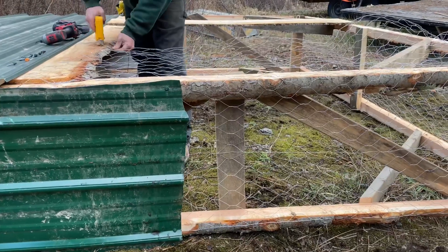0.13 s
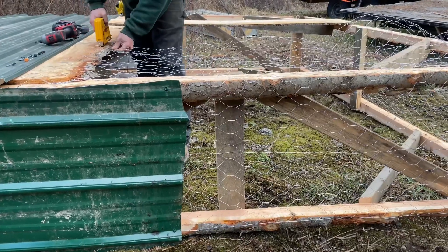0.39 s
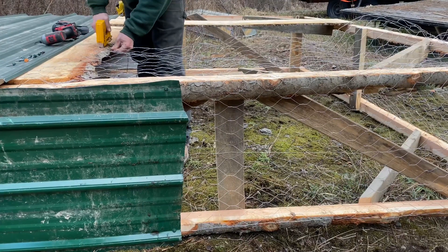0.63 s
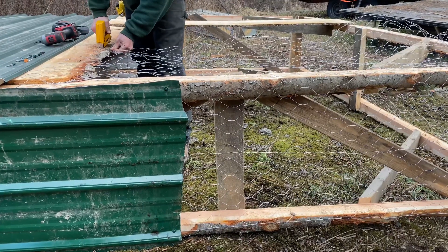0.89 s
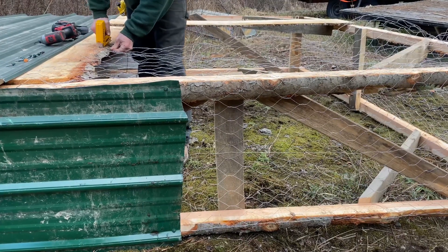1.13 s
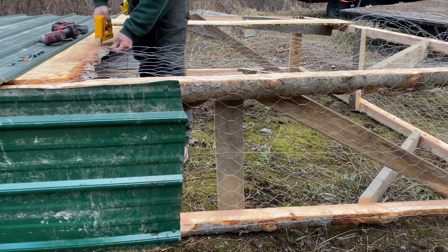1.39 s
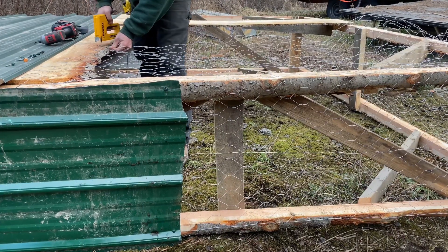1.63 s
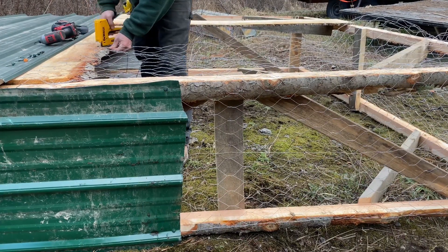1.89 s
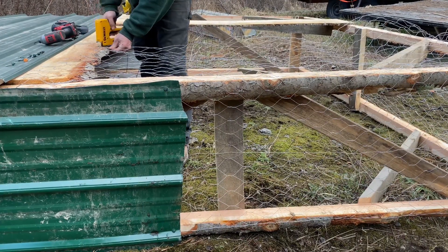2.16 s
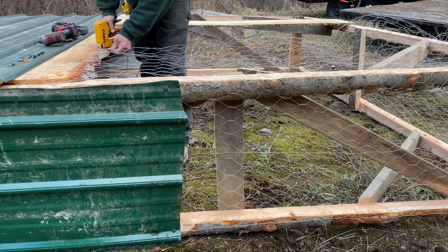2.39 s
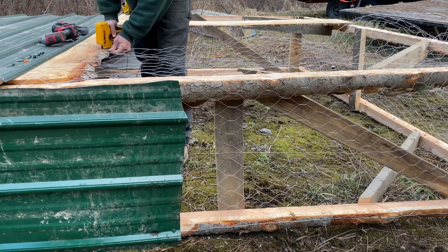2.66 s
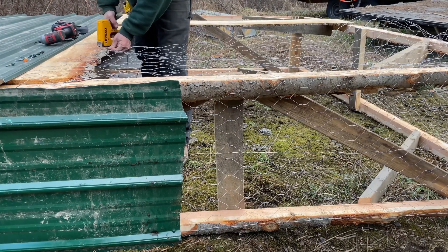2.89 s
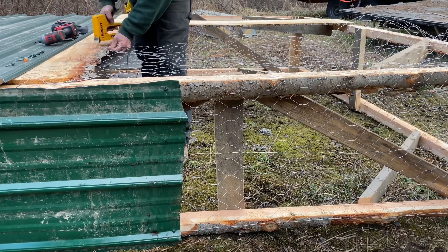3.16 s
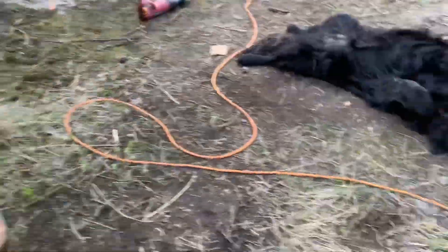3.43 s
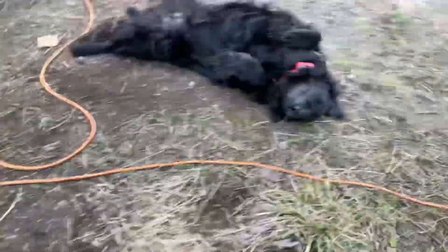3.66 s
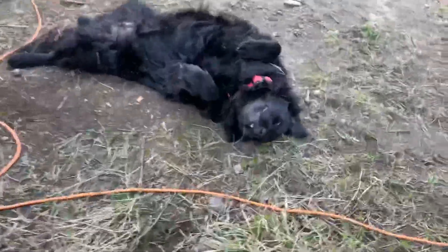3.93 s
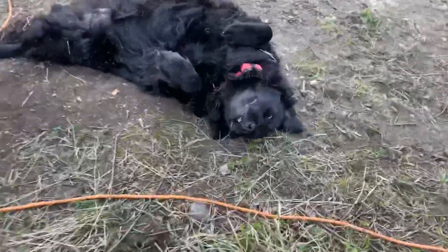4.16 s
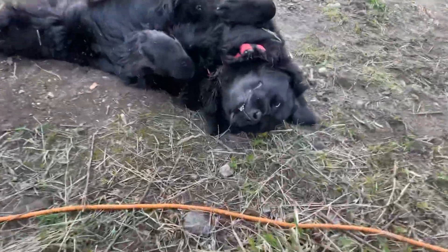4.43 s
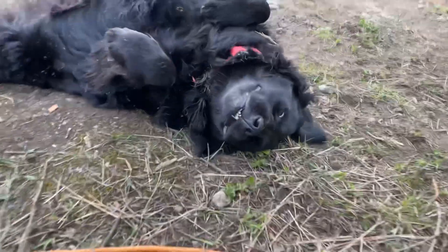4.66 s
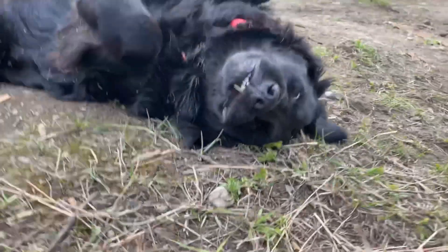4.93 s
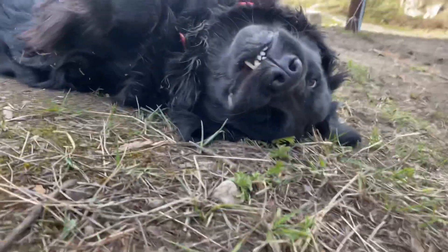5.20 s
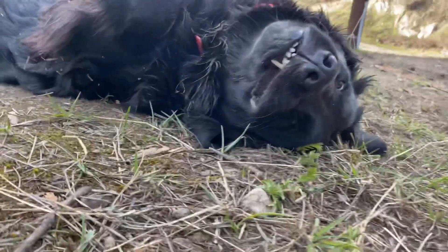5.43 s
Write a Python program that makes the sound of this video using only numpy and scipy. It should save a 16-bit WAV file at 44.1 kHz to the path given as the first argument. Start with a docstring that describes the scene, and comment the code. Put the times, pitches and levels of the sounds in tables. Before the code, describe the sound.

Quiet open-air wash with faint rustling and tiny wire ticks. At about 0.97 s a staple gun slams close by: a knock and bright steel crack, wooden ring, thin spring tone, brief yard echo and a low fluttering boom from loose tin. From 1.24 to 1.35 s the handle clatters and knocks with mesh rustle and another tin boom. Light metallic clicks and short high pings come around 1.85 and 2.1 s, a tick at 2.3 s. A second sharp shot hits at 2.6 s, followed by a cluster of clicks and a soft knock at 2.86-2.95 s. At 3.29 s the background abruptly changes to a farther place. Fur and dry grass rustle until about 4 s; a weaker, distant shot at 4.14 s, then small ticks and a faint wavering scrape at 4.36-4.6 s. A loud, close dry pop lands at 4.96 s; slight rustle, ticks and low rumble finish.

```python
"""Outdoors in a yard, by a log frame under a loose tin roof: a spring staple gun fires into the wood.
Each shot is a steel rattle of about 10 ms that shakes wood and tin, built from shaped noise and dying tones.
Its handle ticks between shots. At CUT_S the scene cuts to a farther place, with a dog rolling in dry grass:
one more shot, rustle made of grainy noise, a short scrape and a pop. Two spaced microphones hear it all."""
import sys
import numpy as np
from scipy import signal
from scipy.fft import rfft, irfft, next_fast_len
from scipy.io import wavfile
from scipy.ndimage import uniform_filter1d

SR = 44100
rng = np.random.default_rng(int(sys.argv[2]) if len(sys.argv) > 2 else 0)


def master_out(mix):
    """Clip the mix to full scale and print it as 16-bit PCM to the path in sys.argv[1]."""
    frames = np.transpose(np.atleast_2d(mix))
    ceiling = np.clip(frames, -1, 1)
    pcm = np.round(ceiling * 32767).astype(np.int16)
    wavfile.write(sys.argv[1], SR, pcm)


def voltage_ratio(level):
    """Linear amplitude factor for a level in decibels (scalar or array-like)."""
    return 10 ** (np.asarray(level, float) / 20)


N = 245195  # samples in the whole scene

CUT_S = 3.287  # "near" is before this time, "far" after it
AIR_LAG, NEAR_LAG = 18.06, 7  # samples by which the right ear trails: general, and for the gun close by


def evened(x):
    """Scales a sound to rms 1."""
    return x / np.sqrt(np.mean(x ** 2) + 1e-20)


def wander(length, size):
    """Slow random drift of rms 1: noise averaged over size samples."""
    return evened(uniform_filter1d(rng.standard_normal(length), size=size))


def read(points, hz):
    """Reads a table of (pitch, value) between its points, on a log pitch axis."""
    f, value = np.transpose(points)
    return np.interp(np.log(hz + 1), np.log(f + 1), value)


def add(mix, s, sound):
    """Mixes a two-channel sound in at s seconds."""
    part = mix[:, round(s * SR):][:, :sound.shape[1]]
    part += sound[:, :part.shape[1]]


def coloured(x, db_of_hz):
    """Makes each pitch louder or softer by a gain in dB."""
    size = next_fast_len(x.shape[-1] + 512)
    gain = voltage_ratio(db_of_hz(np.fft.rfftfreq(size, 1 / SR)))
    return irfft(rfft(x, size) * gain, size)[..., :x.shape[-1]]


def ears(length, lag, alike):
    """White noise at two microphones: a shared part that arrives late on the right, and a private part."""
    shared, private = rng.standard_normal((2, length))
    alike = np.clip(alike, 0, 1)
    return np.array([shared, alike * np.roll(shared, round(lag)) + np.sqrt(1 - alike ** 2) * private])


def spaced(x, lag, left_db):
    """One sound at both microphones, late on the right and left_db louder on the left."""
    return np.array([voltage_ratio(left_db / 2) * x, voltage_ratio(-left_db / 2) * np.roll(x, round(lag))])


# How alike the two ears hear spread-out noise: pitch_hz, likeness (0 to 1)
ALIKE = [(60, 0.92), (200, 0.47), (500, 0.47), (1500, 0.24), (4000, 0.24), (12000, 0.2)]


def field(db_of, lag, length, size=512, patchy_db=0.07):
    """Noise from all around, built of random short spectra; db_of(hz, s) shapes its level."""
    frames, hz = length * 4 // size + 5, np.fft.rfftfreq(size, 1 / SR)[:, None]
    a, b, c, d, patch = rng.standard_normal((frames, len(hz), 5)).T
    patch = evened(uniform_filter1d(uniform_filter1d(patch, size=6, axis=0), size=16, axis=1))
    same = np.clip(read(ALIKE, hz), 0, 1)
    left, private = a + 1j * b, c + 1j * d
    late = np.exp(-2j * np.pi * hz * lag / SR)
    right = same * left * late + np.sqrt(1 - same ** 2) * private
    level_db = db_of(hz, np.arange(frames) * size / 4 / SR) + patchy_db * patch
    z = np.array([left, right]) * voltage_ratio(level_db)
    return signal.istft(z, nperseg=size, noverlap=size * 3 // 4)[1][:, :length]


def rung(modes, tilt_db=0, length=0.44, contact=0.00109):
    """A struck object: dying sine tones that fade in over contact seconds, peak 1."""
    t = np.arange(round(length * SR)) / SR
    x = 0
    for hz, db, t60 in modes:
        fading_db = db + tilt_db * np.log2(hz / 500) - 60 * t / max(t60, 1e-3)
        x = x + voltage_ratio(fading_db) * np.sin(2 * np.pi * hz * t)
    x = x * np.clip(t / contact, 0, 1)
    return x / abs(x).max()


def rattle(length, lag, alike, rise=0.27, sag=0.56):
    """A noise burst like many tiny impacts: swelling rise, sagging body, then a short dying chatter."""
    t = np.arange(round(6 * length * SR)) / SR / length  # 1 = end of the body
    body = np.interp(t, [0, np.clip(rise, .01, .9), 1], [0, 1, 1 - np.clip(sag, 0, .95)]) ** 1.2
    chatter = 0.14 * np.exp(-(t - 1) / 0.79)
    return ears(len(t), lag, alike) * np.where(t < 1, body, chatter)


def bounced(x):
    """Adds a late copy off the tin to the left ear and evens up the right ear's power."""
    lag, share = 15, 0.15  # lag in samples
    return np.array([x[0] + share * np.roll(x[0], lag), x[1] * np.sqrt(1 + share ** 2)])


# Colour of the open air, near and far: pitch_hz, level_db (relative)
AIR_NEAR = [(18, -33), (30, -5), (103, -2.5), (221, -20), (426, -9.5), (866, -10), (2480, -22.5),
            (3580, -26), (6900, -31.5), (8520, -42.5), (10800, -37), (12600, -64), (16000, -81)]
AIR_FAR = [(18, -32), (30, -1), (179, 3), (233, -2.5), (760, -4), (1390, -9), (2540, -9), (3580, -15),
           (7670, -21), (10500, -43), (12300, -36), (13300, -62), (16000, -55)]
AIR_NEAR_DB, AIR_FAR_DB = -51, -54.5


def air():
    """Far wash of the countryside: steady coloured noise whose colour and level switch at the cut."""
    near = voltage_ratio(AIR_NEAR_DB) * evened(field(lambda hz, t: read(AIR_NEAR, hz), AIR_LAG, N, size=1024))
    far = voltage_ratio(AIR_FAR_DB) * evened(field(lambda hz, t: read(AIR_FAR, hz), AIR_LAG, N, size=1024))
    t = np.arange(N) / SR
    return near * np.clip((CUT_S - t) / 0.0058, 0, 1) + far * np.clip((t - CUT_S) / 0.015, 0, 1)


# Ways the loose roof sheet wobbles: pitch_hz, width_hz (where 6 dB down), level_db (relative)
# The first four make the boom, the rest are the upper modes.
TIN = [(69.5, 30, -10), (98.5, 45, 0.5), (134.3, 15, 1.5), (171, 58, -9.5), (239, 90, 1), (289, 69, -5),
       (339.6, 120, -1.5), (500, 230, -8.5)]


def shaken(modes):
    """Noise through the sheet's resonances, rms 1, nearly the same at both ears."""
    def power(hz):
        return sum(voltage_ratio(2 * db) / (1 + (2 * (hz - f) / w) ** 2) ** 2 for f, w, db in modes)
    return evened(coloured(ears(N, 8, 0.95), lambda hz: 10 * np.log10(power(hz))))


# Slight stirring of the sheet, swelling and sinking over time: time_s, boom_db, upper_against_boom_db
STIR = [(0, -64.5, -4), (.4, -57, -5.5), (.65, -48, -10), (.9, -55, -8), (1.9, -50, -7.5), (2.3, -53, -7.5),
        (2.55, -47, -10), (3.28, -48.5, -14.5), (3.3, -78, -17), (3.65, -62.5, -0.5), (3.85, -75, 1),
        (4.15, -76, 5), (4.701, -56.5, -2), (5.03, -52.5, -4.5), (5.56, -55, -5)]
# Jolts to the sheet: start_s, boom_db, hold_s, upper_db, upper_fade_db_per_s
JOLTS = [(0.963, -30, 0.19, -31, 90), (1.238, -34, 0.18, -36.5, 43), (2.6, -32, .19, -34, 80),
         (2.865, -41.5, .05, -45.5, 53.5), (4.148, -46.5, 0.23, -41.5, 45.5)]
JOLT_RISE_S, BOOM_FADE_DB_PER_S = 0.0097, 47.5
FLAP_HZ, FLAP_SWING_DB, FLAP_FIRST_S, FLAP_DIES_S = 15, 4.5, 0.041, 0.54  # swing either side of the middle
LUMPY_DB = 2.5  # rms of the random lumps in the shaking
STRUCK_HZ, STRUCK_DB, STRUCK_T60_S = 130.1, 3, .5  # ring of the main mode, peak against the jolt's boom


def tin():
    """The roof sheet's modes are shaken at random by a slow stir and by jolts, which also make it flap."""
    t = np.arange(N) / SR
    s, stir_db, stir_upper_db = np.transpose(STIR)
    # boom and upper are powers, so that stir and jolts add up
    boom = voltage_ratio(2 * np.interp(t, s, stir_db))
    upper = voltage_ratio(2 * np.interp(t, s, stir_db + stir_upper_db))
    for s, boom_db, hold, upper_db, fade_db_per_s in JOLTS:
        since = np.maximum(t - s, 0)
        same_side = (t < CUT_S) == (s < CUT_S)  # this shaking does not carry across the cut
        heard = np.clip(since / JOLT_RISE_S, 0, 1) ** 2 * same_side
        flap = np.cos(2 * np.pi * FLAP_HZ * (since - FLAP_FIRST_S)) - 1  # the boom throbs with it
        flap_db = FLAP_SWING_DB * np.exp(-since / FLAP_DIES_S) * flap
        fade_db = BOOM_FADE_DB_PER_S * np.maximum(since - hold, 0)
        boom = boom + heard * voltage_ratio(2 * (boom_db + flap_db - fade_db))
        upper = upper + heard * voltage_ratio(2 * (upper_db - fade_db_per_s * since))
    boom_lumps, upper_lumps = [voltage_ratio(LUMPY_DB * wander(N, 2000)) for _ in range(2)]
    sheet = np.sqrt(boom) * boom_lumps * shaken(TIN[:4])
    sheet = sheet + np.sqrt(upper) * upper_lumps * shaken(TIN[4:])
    for s, boom_db, *_ in JOLTS:
        ring = rung([(STRUCK_HZ, 0, STRUCK_T60_S)], contact=0.013)
        add(sheet, s, voltage_ratio(boom_db + STRUCK_DB) * spaced(ring, 8, 0))
    return sheet * voltage_ratio(np.array([[-.6], [.6]]))  # a little louder on the right


# Colour of rubbing: pitch_hz, level_db (relative)
RUB = [(300, -18.5), (800, 2), (2000, -2), (4000, -4), (7000, -8), (11000, -12), (16000, -37)]
# Strokes of mesh, sleeve, fur and grass: peak_s, level_db, rise_s, fall_s, brightness_db_per_octave
STROKES = [(.12, -63, 0.15, 0.65, 1), (.8, -57.5, .18, 0.16, -2.5), (1.26, -40, .025, 0.136, -1),
           (1.315, -37, .08, 0.15, -5), (1.45, -53.5, .1, .25, -5), (1.86, -53, .03, 0.2, -3),
           (2.5, -60.5, .5, .2, -2.5), (2.91, -46.5, .12, 0.13, -4), (3.199, -74, .3, 0.26, 6),
           (3.31, -49, .03, 0.22, -1), (3.475, -52.5, .1, 0.11, 0), (3.59, -48, .12, 0.16, 0.5),
           (3.68, -49.5, .12, 0.11, -0.5), (3.87, -53.5, .1, 0.32, -1), (4.37, -50, .17, 0.31, -1),
           (4.585, -53, .15, .25, -2.5), (4.9, -56, .4, 0.13, -4), (5.27, -62, .12, 0.11, 0.5)]
STROKE_ENDS_DB = -20  # level one rise before and one fall after the peak, before the ends are faded out


def rustle():
    """Dense fine grains of rubbing: uneven noise with one swell for each stroke."""
    out = np.zeros((2, N))
    for peak, db, rise, fall, tilt_db in STROKES:
        start = max(peak - rise, 0)
        t = np.arange(start, peak + fall, 1 / SR) - peak
        rub = field(lambda hz, s: read(RUB, hz) + tilt_db * np.log2(hz / 4000 + 0.06),
                    AIR_LAG, len(t), size=256, patchy_db=2.3)
        grain = voltage_ratio(0.51 * wander(len(t), 90))
        from_peak = np.where(t < 0, -t / rise, t / fall)
        swell = voltage_ratio(db + STROKE_ENDS_DB * from_peak ** 1.21) * signal.windows.tukey(len(t), .1)
        add(out, start, evened(rub * grain) * swell)
    return out


# Steel body of the gun: pitch_hz, level_db (relative), t60_s (time to fade by 60 dB)
STEEL = [(7050, -5, .05), (9600, -8, .045), (11100, 0, .065), (14100, 4, .09)]
# Moments when the steel is set ringing: start_s, peak_db
PINGS = [(.108, -52), (.804, -52), (1.853, -30), (1.86, -49), (2.099, -33), (2.128, -61)]


def pings():
    """The steel body of the gun rings briefly as a few high dying tones."""
    out = np.zeros((2, N))
    for s, db in PINGS:
        add(out, s, voltage_ratio(db) * spaced(rung(STEEL, length=.08), NEAR_LAG, 0))
    return out


# Ticks of handle, spring and wire: start_s, peak_db, pitch_hz, width_octaves, length_s
TICKS = [(0.781, -44, 2700, 0.31, 0.0085), (0.961, -27.5, 6000, 1.1, 0.0099),
         (1.250, -30, 8000, 0.84, 0.004), (1.253, -29.5, 3340, 0.19, 0.0064), (1.276, -37, 4500, 1.3, .004),
         (1.292, -32, 4970, 1.5, 0.005), (1.333, -37, 4500, 1.2, .005), (1.307, -25, 4970, 1.14, 0.01),
         (1.561, -44.5, 9150, 0.81, 0.0038), (1.831, -35, 9000, 0.73, 0.0037),
         (1.85, -25, 7400, 0.93, 0.0091), (1.861, -34.5, 7000, 1.4, 0.0037),
         (2.104, -36.5, 10080, 0.32, 0.0024), (2.131, -45.5, 8100, 0.75, .002),
         (2.314, -28.5, 9640, 0.86, 0.0014), (2.5957, -22.5, 9240, 2.3, 0.0015),
         (2.863, -23.5, 6500, 1.1, 0.0047), (2.888, -43, 5000, 1.3, .006), (2.900, -22, 6200, 1.16, 0.0044),
         (2.901, -26.5, 2500, 0.18, 0.012), (2.907, -21.5, 5500, 2.1, 0.0076),
         (2.922, -37, 6000, 0.8, 0.0054), (2.937, -26, 7000, 2.2, 0.0083),
         (3.129, -41.5, 6460, 0.36, 0.003), (3.484, -40, 1930, 0.29, 0.0086), (3.851, -36, 6500, 2.1, .004),
         (4.1323, -23.5, 7040, 2.2, 0.0049), (4.356, -28.5, 3000, 1.6, 0.0047),
         (4.386, -36, 7500, 1, 0.0025), (4.429, -30.5, 1950, 0.32, 0.0054),
         (4.913, -42, 1576, 0.24, 0.0028), (5.237, -39.5, 8450, 1.1, 0.0098),
         (5.276, -38, 8500, 1.3, 0.0072)]
# Faint ticks of the wire mesh: how many, then their middle values and the spread of level
FAINT_COUNT, FAINT_DB, FAINT_SPREAD_DB = 16, -51, 4.5
FAINT_HZ, FAINT_OCTAVES, FAINT_S = 9500, .45, 0.0025


def ticks():
    """Short rattles around a centre pitch: the clear ones, plus faint ones at random before the cut."""
    out = np.zeros((2, N))
    place = rng.random(FAINT_COUNT)
    size, pitch = rng.standard_normal((2, FAINT_COUNT))
    faint = [(u * CUT_S, FAINT_DB + FAINT_SPREAD_DB * a, FAINT_HZ * 2 ** (.15 * b), FAINT_OCTAVES, FAINT_S)
             for u, a, b in zip(place, size, pitch)]
    for s, db, centre_hz, width, length in TICKS + faint:
        near = s < CUT_S
        burst = rattle(max(length, .001), NEAR_LAG if near else AIR_LAG, 0.3, rise=0.091)
        burst = np.pad(burst, ((0, 0), (64, 200)))  # room for the filter to ring
        burst = bounced(burst) if near else burst
        tick = coloured(burst, lambda hz: -6 * (np.log2(hz / centre_hz + 0.0012) / width) ** 2)
        add(out, max(s - 64 / SR, 0), voltage_ratio(db) * tick / abs(tick).max())
    return out


# Log frame, rung by knocks and shots: pitch_hz, level_db (relative), t60_s (time to fade by 60 dB)
FRAME = [(195, -5, 0.033), (274, -4.5, 0.067), (345.2, -1, 0.12), (497.4, -3.5, 0.091), (540, -4, 0.19),
         (723.6, -6, 0.1), (921, 1.5, 0.043), (950.4, -3.5, 0.2), (1039, -6.5, 0.16), (1377, 2.5, 0.063),
         (1910, -9.5, 0.099), (2084, -2, .06)]
# Knocks of the gun against the frame: start_s, level_db, brightness_db_per_octave
KNOCKS = [(0.96, -19.5, -5.5), (1.240, -25, -12), (1.265, -27.5, -9.5), (1.292, -31.5, -9),
          (1.860, -31.5, 0), (2.945, -34, 3)]


def knocks():
    """Dull bumps ring the wooden frame as a set of dying tones."""
    out = np.zeros((2, N))
    for s, db, tilt_db in KNOCKS:
        add(out, s, voltage_ratio(db) * spaced(rung(FRAME, tilt_db, contact=0.0029), 8, 2.5))
    return out


# Colour of the yard's answer, near and far: pitch_hz, level_db (relative)
ECHO_NEAR = [(150, -36.5), (250, -4), (397, -9.5), (501, -3.5), (795, -16), (938, -2.5), (1110, -16),
             (1260, -10.5), (1520, -20.5), (3460, -12), (6280, -22), (10800, -33.5), (12400, -46.5),
             (13000, -53.5)]
ECHO_FAR = [(120, -46), (200, -14), (338, -1), (447, -9.5), (997, -14), (1340, -22), (1970, -15.5),
            (3270, -20), (3630, -14), (5330, -18), (10200, -26.5), (12300, -37), (13000, -38)]
# How long the answer lasts: pitch_hz, t60_s (time to fade by 60 dB)
ECHO_T60 = [(200, 0.67), (600, 0.78), (1500, 0.84), (4000, 0.38), (8000, 0.42), (14000, 1)]


def yard_echo(near, lag):
    """The yard answers in uneven scattered returns: noise that fades at its own pace at each pitch."""
    colour, length = ECHO_NEAR if near else ECHO_FAR, SR // 2
    echo = field(lambda hz, t: read(colour, hz) - 60 * t / read(ECHO_T60, hz),
                 lag, length, size=256, patchy_db=2.47)
    echo *= np.clip(np.arange(length) / (0.0032 * SR), 0, 1) / np.std(echo[:, :1000])
    return echo * voltage_ratio(1.5 * wander(length, 200))


# Shots: start_s, crack_rms_db, rattle_length_s, echo_db, frame_blow_db, brightness_db_per_octave
SHOTS = [(0.9732, -20, 0.012, -29.5, -14, 2.5), (2.604, -19, 0.0087, -28.5, -17, 4.2),
         (4.1385, -22.5, .0135, -35.5, -39, -0.5)]
# Colour of the crack, near and far: pitch_hz, level_db (relative)
CRACK_NEAR = [(200, -37), (300, -4), (800, -7), (2450, -2.5), (2950, -3), (3550, -3), (4140, -0.5),
              (5200, -9), (6370, -3), (7910, -9.5), (10100, 1), (12000, -15), (16000, -17)]
CRACK_FAR = [(300, -44.5), (660, -4.5), (1660, -10), (2690, 2), (3230, -2), (4980, -6.5), (6180, -8),
             (6780, -5), (8680, -9.5), (11300, -6.5), (16000, -28)]
# The gun's spring: pitch_hz, level_db (relative), t60_s (time to fade by 60 dB)
SPRING = [(2705, -4, .3), (3340, 0, 0.48), (3500, -2.5, .35), (3680, -5, .3), (4760, -4, .3),
          (6200, -7, .25)]
SPRING_NEAR_DB, SPRING_FAR_DB = -12, -15  # spring's peak against the crack
FAR_DULL_DB = -13  # brightness of the frame's ring from afar, per octave


def shots():
    """The driver blade slams a staple home: crack, ringing frame, singing spring, then the yard's answer."""
    out = np.zeros((2, N))
    for s, db, length, echo_db, blow_db, tilt_db in SHOTS:
        near = s < CUT_S
        lag = NEAR_LAG if near else AIR_LAG
        rise, sag = (.33, .5) if near else (.48, .75)
        burst = rattle(length, lag, 0.65, rise, sag)
        burst = bounced(burst) if near else burst
        colour = CRACK_NEAR if near else CRACK_FAR
        crack = coloured(burst, lambda hz: read(colour, hz) + tilt_db * np.log2(hz / 4000 + 1))
        add(out, s, voltage_ratio(db) * evened(crack))
        blow = rung(FRAME, 1.5 if near else FAR_DULL_DB, contact=0.0057)
        add(out, s + .002, voltage_ratio(blow_db) * spaced(blow, lag, 3 * near))
        sing_db = db + (SPRING_NEAR_DB if near else SPRING_FAR_DB)
        add(out, s + .004, voltage_ratio(sing_db) * spaced(rung(SPRING, contact=.005), lag, 0))
        add(out, s + .004, voltage_ratio(echo_db) * yard_echo(near, lag))
    return out


SCRAPE_S, SCRAPE_LENGTH_S, SCRAPE_DB, SCRAPE_FADE_DB = 4.357, 0.26, -53.5, -8
SCRAPE_START_HZ, SCRAPE_END_HZ, SCRAPE_WAVER_HZ, SCRAPE_FLUTTER_DB = 1740, 1670, 70.2, 0.5  # last two rms


def scrape():
    """Noise in one narrow resonance that slides down and wavers: slow noise carried on a moving tone."""
    u = np.arange(0, 1, 1 / SR / SCRAPE_LENGTH_S)  # 0 to 1 along the scrape
    r = np.exp(-np.pi * 300 / SR)  # sets how narrow the resonance is
    slow = signal.lfilter([1], np.poly([r, r]), ears(len(u), 0, 0.27) + 1j * ears(len(u), 0, 0.84))
    hz = SCRAPE_END_HZ + (SCRAPE_START_HZ - SCRAPE_END_HZ) * (1 - u) ** 2
    hz = hz + SCRAPE_WAVER_HZ * wander(len(u), 900)
    tone = (slow * np.exp(2j * np.pi * np.cumsum(hz) / SR)).real
    tone *= voltage_ratio(SCRAPE_FLUTTER_DB * wander(len(u), 700))
    fade = voltage_ratio(SCRAPE_DB + SCRAPE_FADE_DB * u ** 2) * signal.windows.tukey(len(u), .2)
    out = np.zeros((2, N))
    add(out, SCRAPE_S, evened(tone) * fade)
    return out


# A twig or pebble pops: pitch_hz, level_db (relative), t60_s (time to fade by 60 dB)
POP = [(1140, -4, 0.0046), (1590, 26.5, 0.0028), (2260, 8.5, 0.011), (3000, -27, 0.0018),
       (4240, -1.5, 0.0051), (5260, 0.5, 0.0046), (7200, -5.5, 0.0034)]
POP_S, POP_DB = 4.9617, -9


def pop():
    """One dry pop close in front: quick dying tones; so small a body radiates no bass."""
    out = np.zeros((2, N))
    snap = np.pad(rung(POP, length=.02, contact=0.000436), (300, 0))  # room for the filter to ring
    snap = coloured(snap, lambda hz: -40 / (1 + (hz / 600) ** 4))
    add(out, POP_S - 300 / SR, voltage_ratio(POP_DB) * spaced(snap, 0, -2.5))
    return out


def scene():
    """All sources added together."""
    return air() + tin() + rustle() + pings() + ticks() + knocks() + shots() + scrape() + pop()


# Colour of the microphones: pitch_hz, gain_db
MIC = [(18, -29.5), (45, 0.5), (70, -2.5), (12300, 1.5), (13400, -28.5), (14500, -3), (16000, -10.5),
       (17000, -62.5)]


def microphones(dry):
    """Microphone colour, then a recorder that saturates smoothly near full scale."""
    heard = coloured(dry, lambda hz: read(MIC, hz))
    ceiling = .92
    return heard / (1 + (heard / ceiling) ** 8) ** (1 / 8)


def roll_off(x):
    """The treble ends steeply here."""
    return signal.sosfilt(signal.butter(12, 16810, fs=SR, output="sos"), x)


def record(dry):
    """Passes the scene through the microphones and finishes the mix."""
    mix = microphones(dry)
    return roll_off(mix)


dry = scene()
out = record(dry)
master_out(out)
```